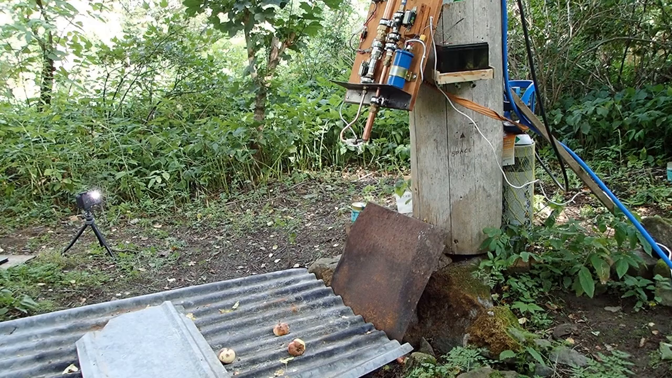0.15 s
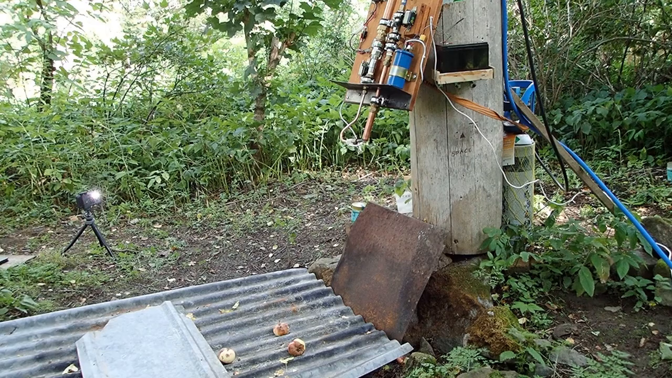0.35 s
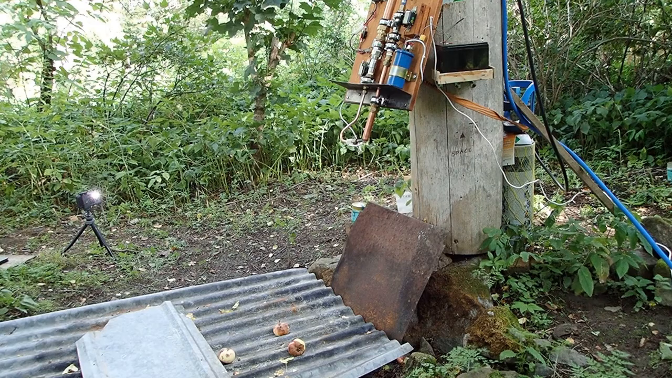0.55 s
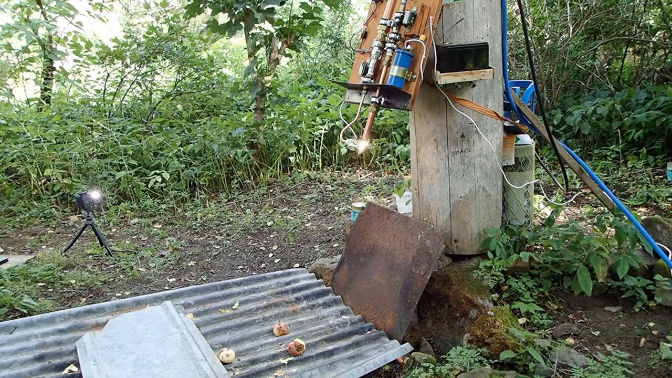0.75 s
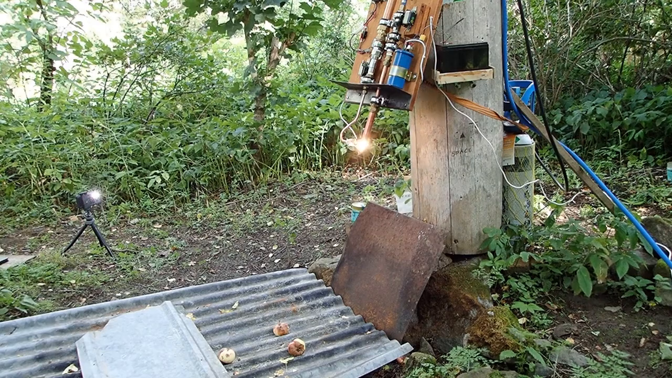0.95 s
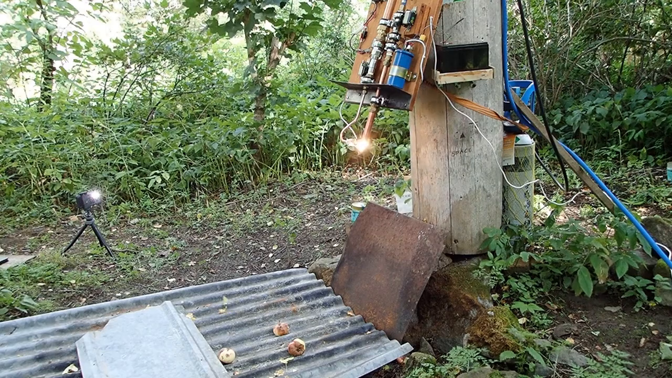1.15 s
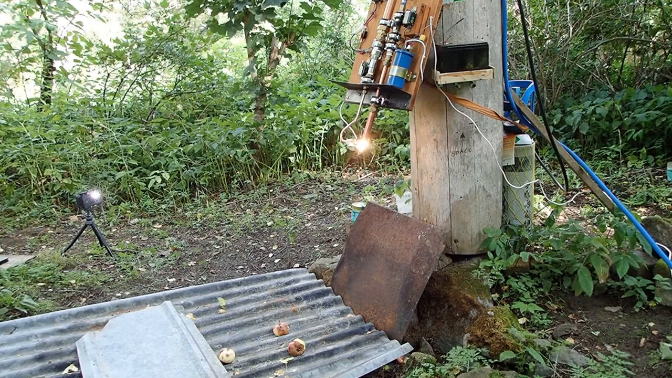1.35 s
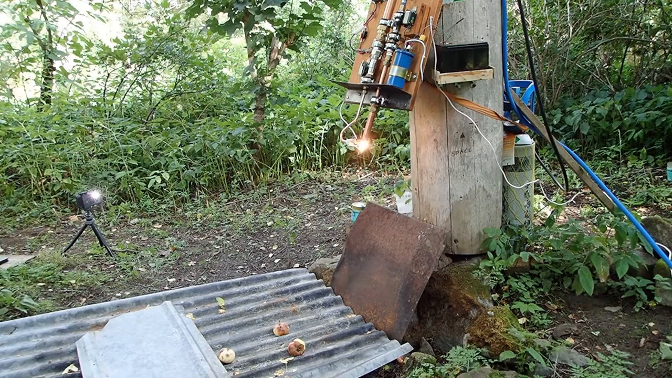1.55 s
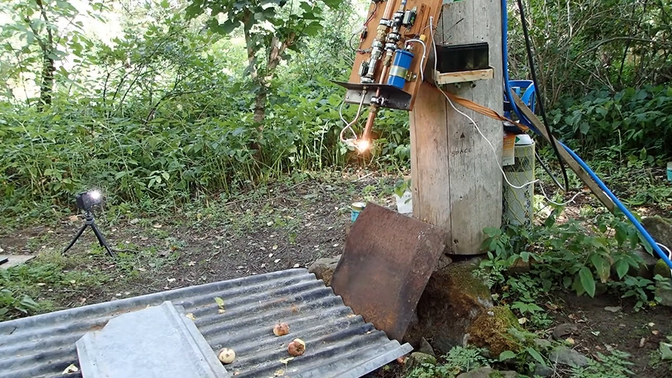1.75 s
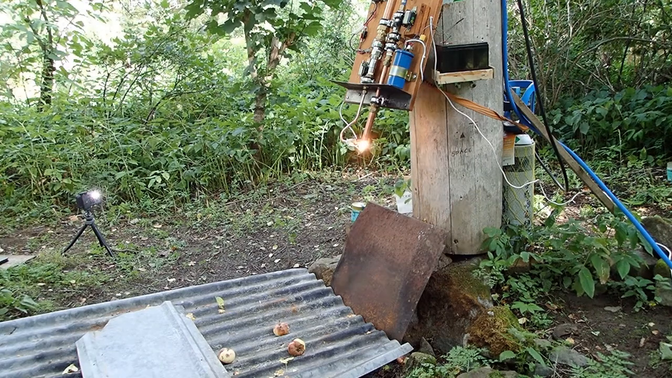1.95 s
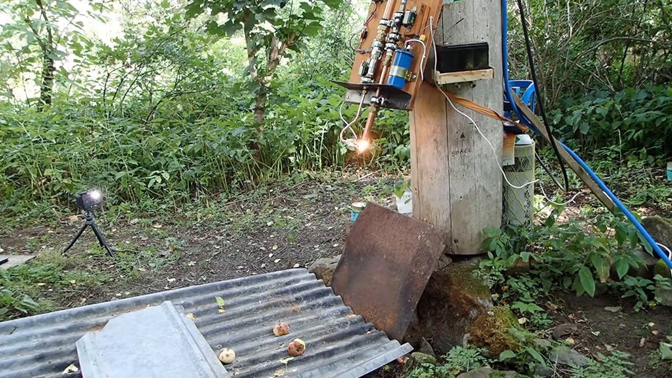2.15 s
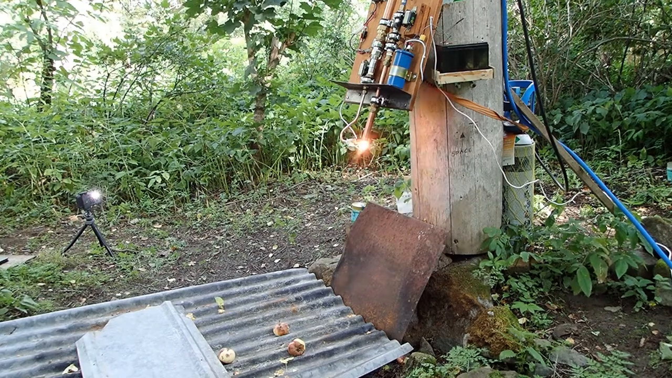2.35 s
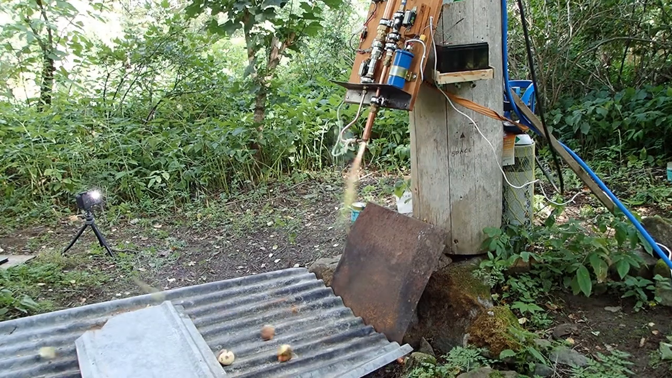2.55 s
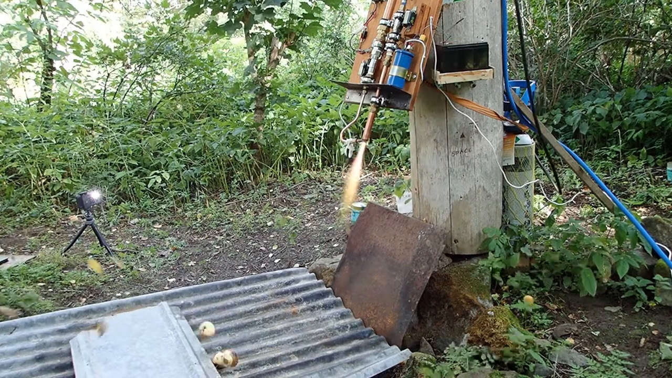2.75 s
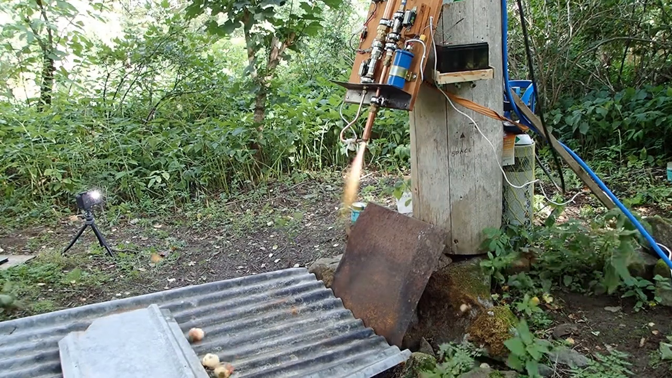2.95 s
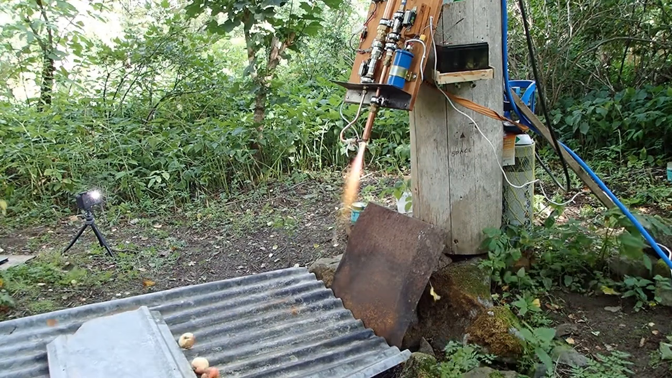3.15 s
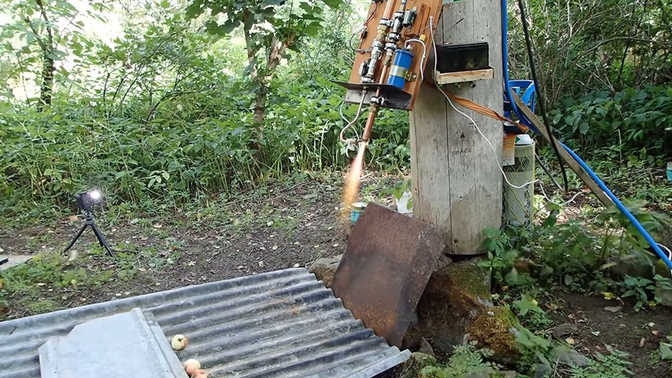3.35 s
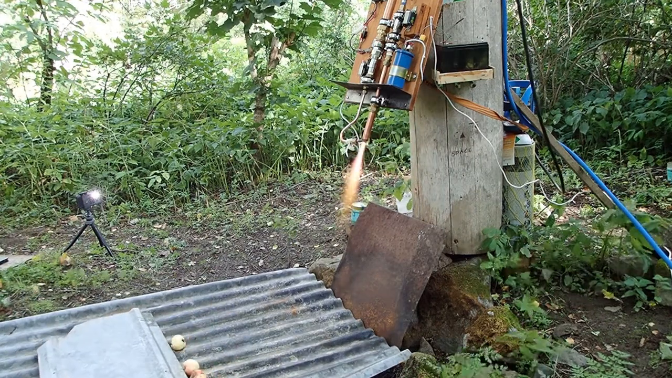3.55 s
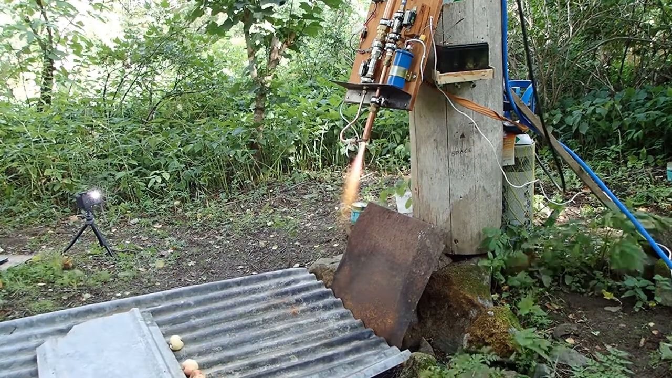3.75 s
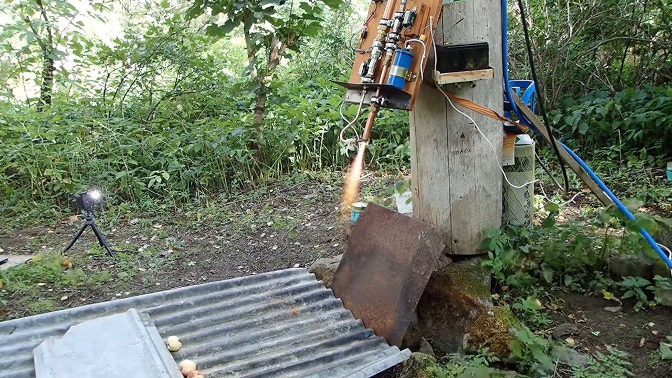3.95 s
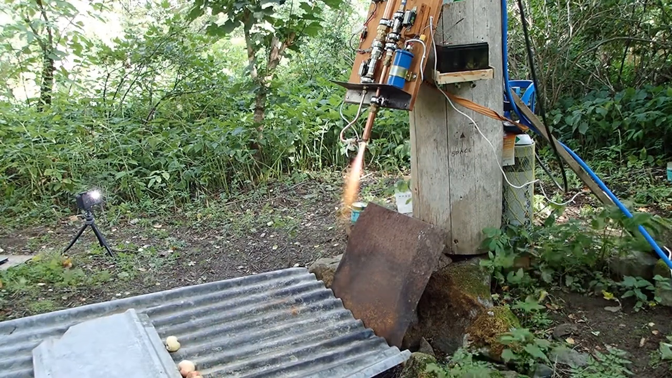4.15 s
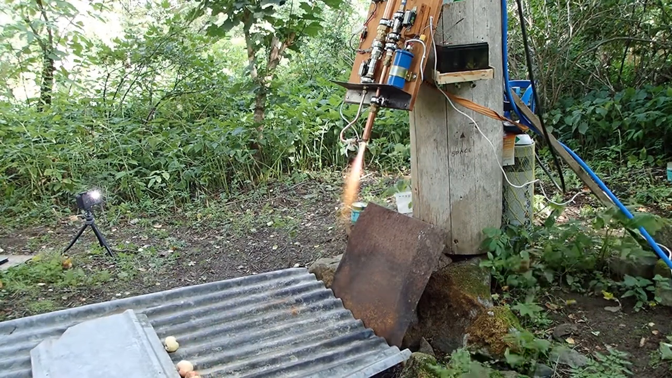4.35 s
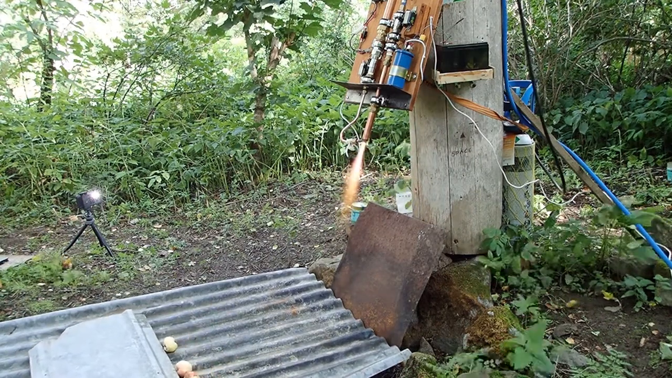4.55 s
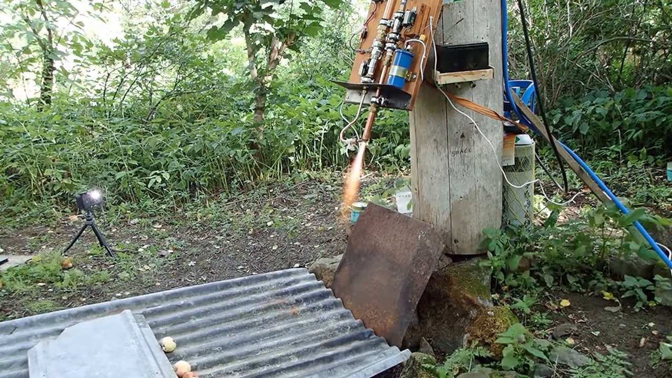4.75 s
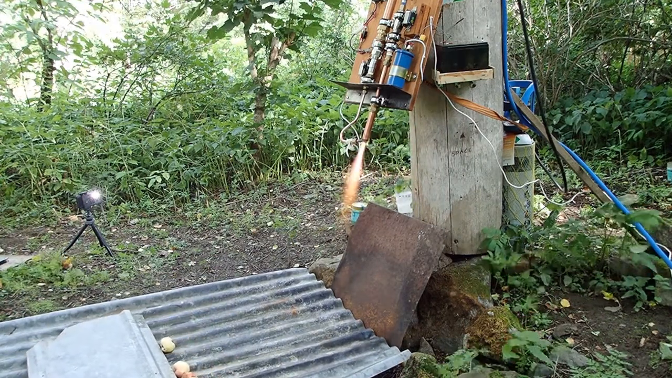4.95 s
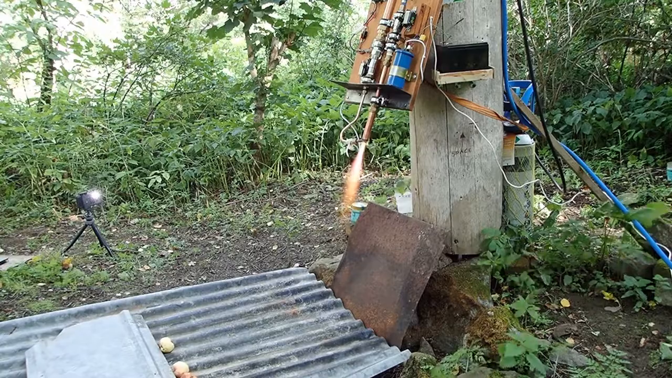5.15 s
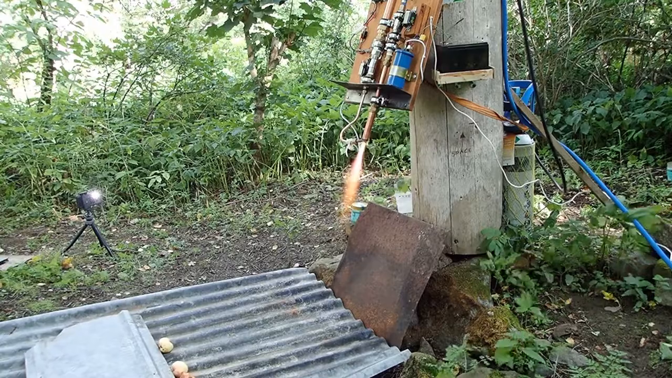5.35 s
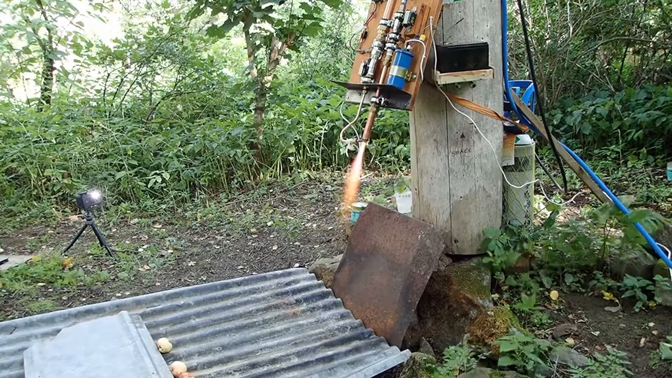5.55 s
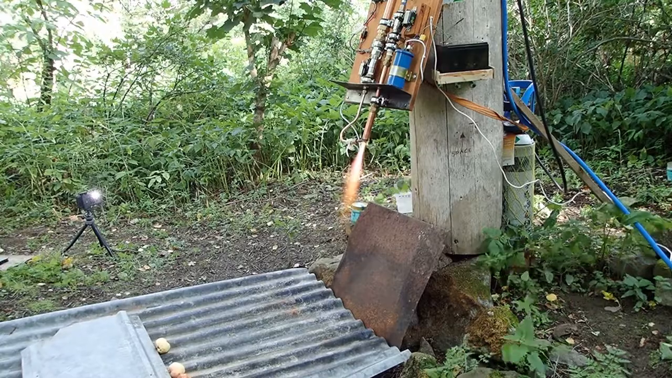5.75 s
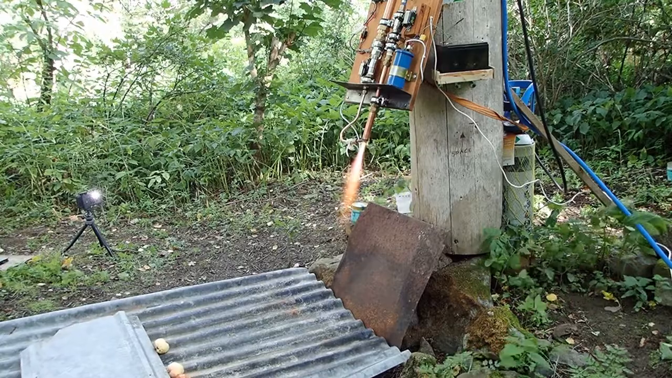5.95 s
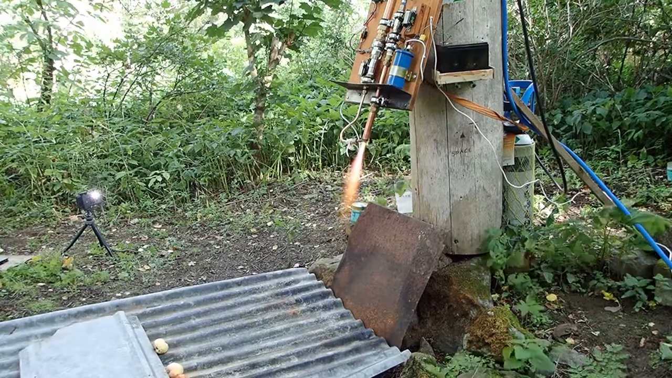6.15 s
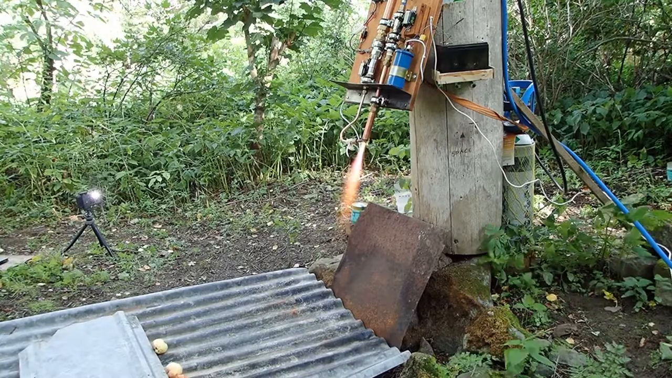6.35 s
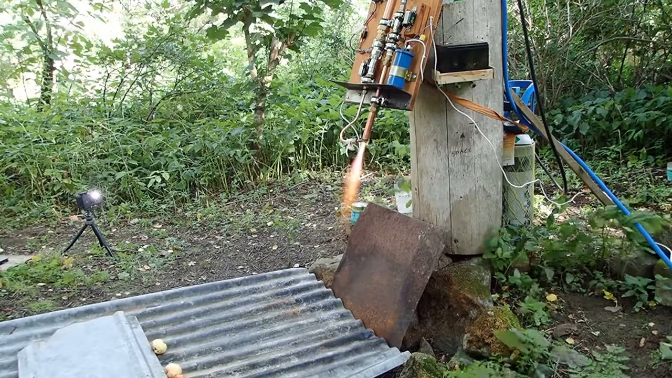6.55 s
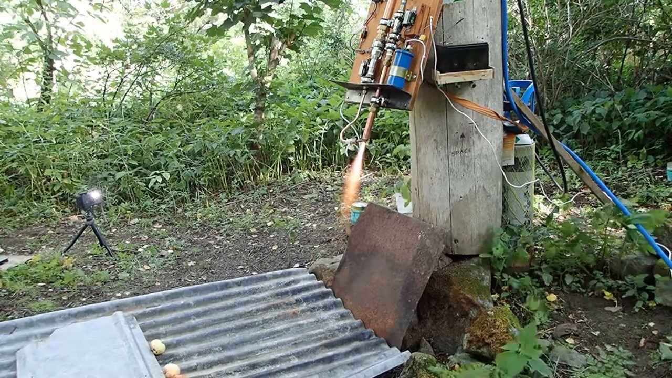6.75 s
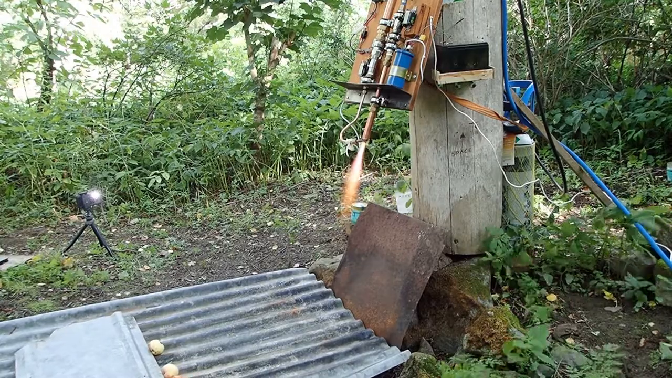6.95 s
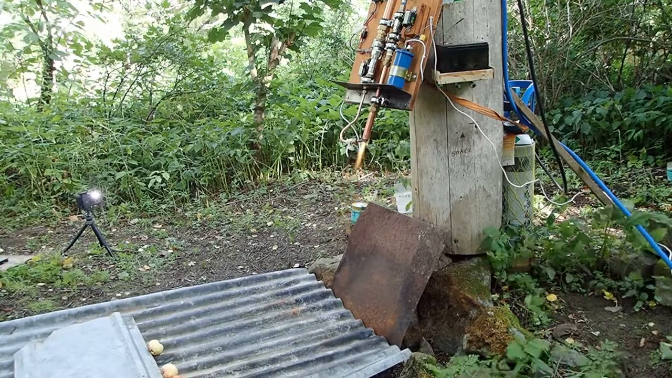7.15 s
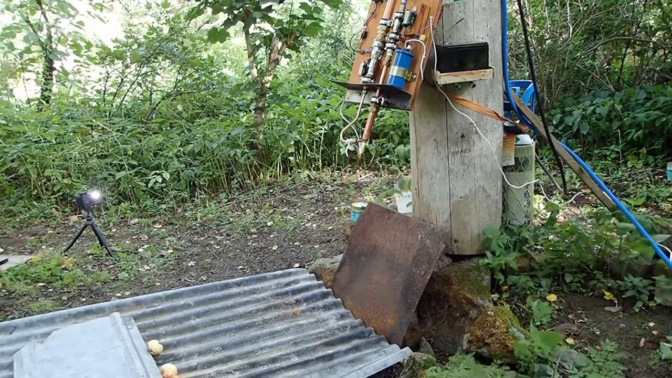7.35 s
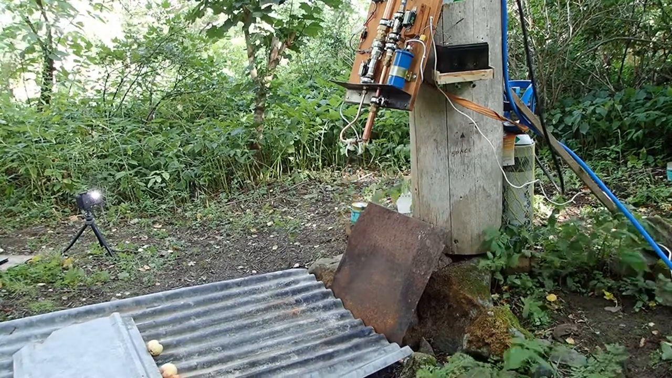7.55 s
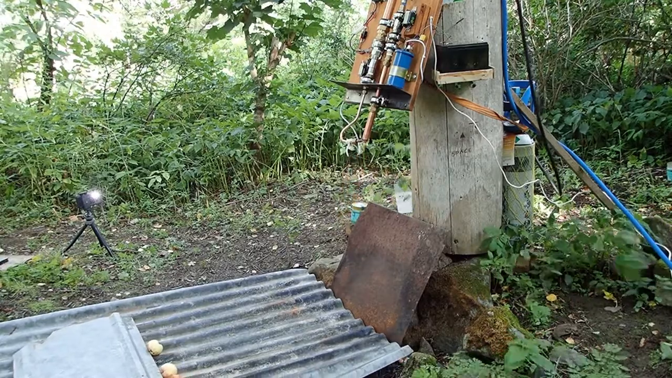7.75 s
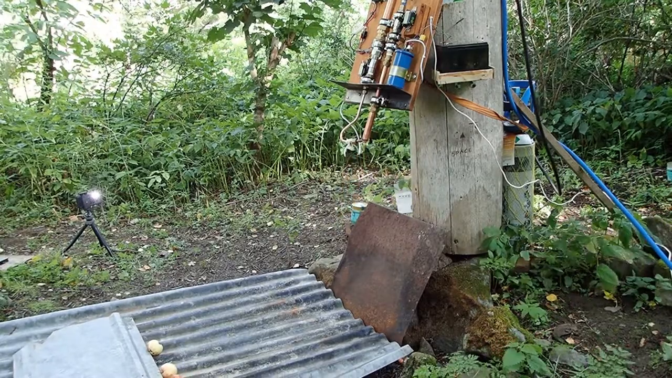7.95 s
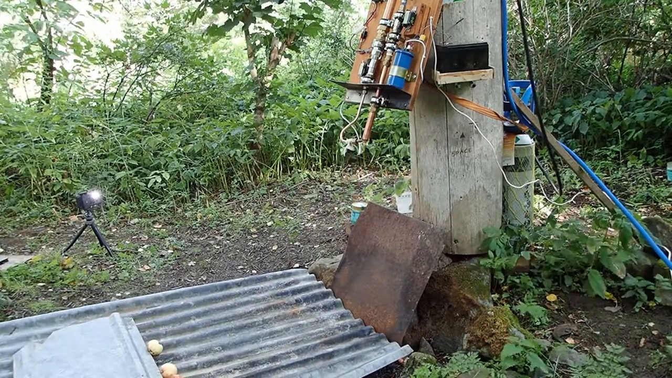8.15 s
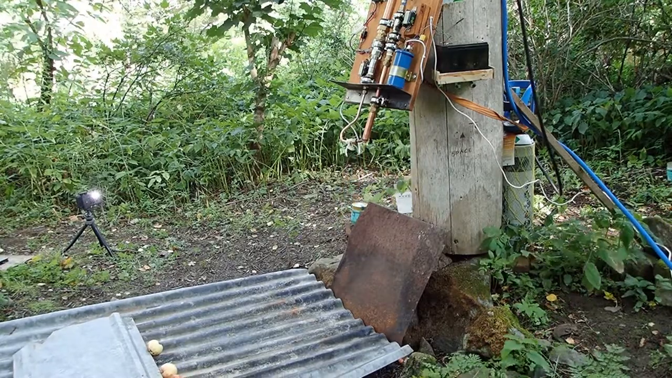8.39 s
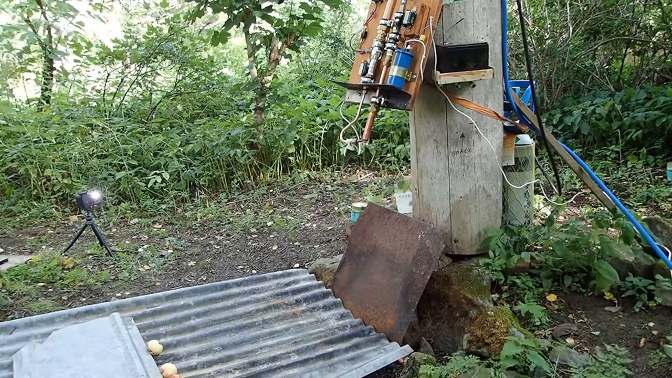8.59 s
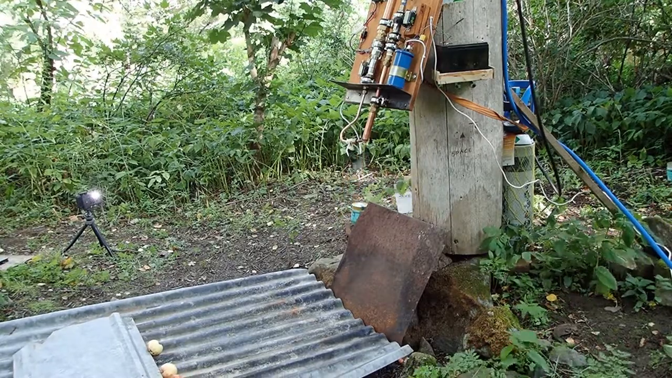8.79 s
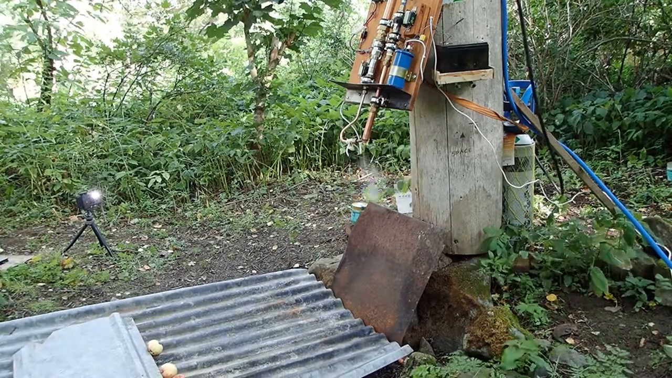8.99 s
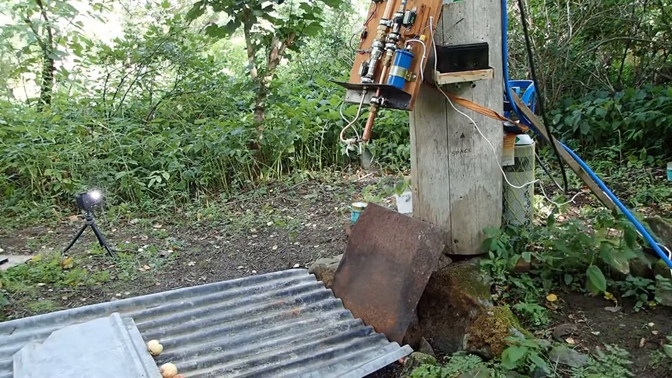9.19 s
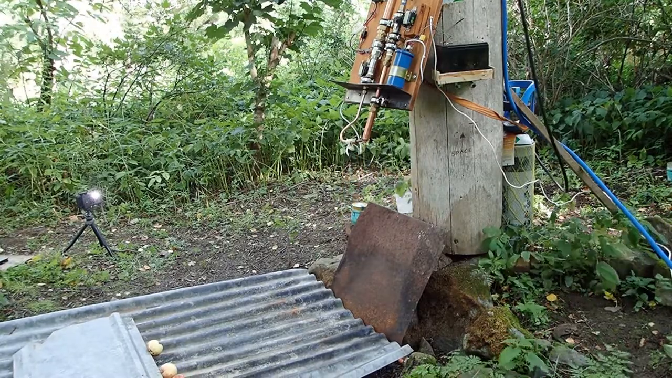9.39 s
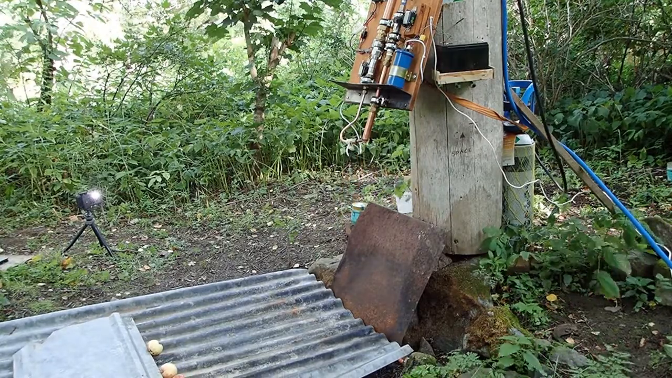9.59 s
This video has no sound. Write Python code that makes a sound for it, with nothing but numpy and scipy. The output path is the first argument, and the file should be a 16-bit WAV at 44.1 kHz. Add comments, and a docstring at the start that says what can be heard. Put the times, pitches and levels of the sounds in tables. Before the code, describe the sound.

A faint gas whistle, then a sputtering hissing flame, a sharp pop, a rough steady howl under loud jet hiss, and a ringing fade.

```python
"""A small rocket engine outdoors: its chamber howls on one rough note under a hissing jet.
First gas seeps, then the valve opens and a flame sputters at the nozzle until it pops into the chamber.
The flame goes out, the feed falters, a last rush of gas blows through and the emptying pipe rings as it fades.
Jet, roar and rumble are shaped noise, ringing parts are noise in narrow resonances, the howl is a
modulated sine with an overtone, and the pops are noise puffs and pressure pulses."""
import sys
import numpy as np
from scipy.fft import rfft, irfft, next_fast_len
from scipy.io import wavfile
from scipy.ndimage import uniform_filter1d, map_coordinates

SR = 44100
rng = np.random.default_rng(int(sys.argv[2]) if len(sys.argv) > 2 else 0)


def master_out(mix):
    """Clip the mix to full scale and print it as 16-bit PCM to the path in sys.argv[1]."""
    frames = np.transpose(np.atleast_2d(mix))
    ceiling = np.clip(frames, -1, 1)
    pcm = np.round(ceiling * 32767).astype(np.int16)
    wavfile.write(sys.argv[1], SR, pcm)


N = 424241

SEEP_ON, VALVE_OPEN, IGNITION, FLAME_OUT, FEED_GAP, VENTING = 0.073, .778, 2.587, 7.212, 7.67, 8.793  # s


def amp(db):
    """Decibels are 20 times the logarithm of an amplitude ratio."""
    return 10 ** (np.asarray(db) / 20)


def unit(x):
    """Normalization to an rms of 1."""
    return x / np.sqrt(np.mean(x ** 2) + 1e-20)


def clock():
    """The time of each sample in seconds."""
    return np.arange(N) / SR


def since(start):
    """Elapsed time in seconds, 0 before start."""
    return np.maximum(clock() - start, 0)


def after(start, rise):
    """A linear transition from 0 to 1 centred on start."""
    return np.clip((clock() - start) / rise + .5, 0, 1)


def swell(s, rise, fall):
    """A two-sided Gaussian envelope of height 1 at time s."""
    t = clock() - s
    return np.exp(-(t / np.where(t < 0, rise, fall)) ** 2)


def puff(start, life):
    """An impulsive onset with exponential decay."""
    return after(start, life / 4) * np.exp(-np.clip((clock() - start) / life, 0, 50))


def push(start, length):
    """One pressure pulse and its opposite rebound."""
    u = np.clip((clock() - start) / length, 0, 50)
    return u * (2 - u) * np.exp(-u)


def along(points, hz):
    """Interpolation of (f/Hz, value) points on a logarithmic frequency axis."""
    f, v = np.transpose(points)
    return np.interp(np.log(hz + 1), np.log(f), v)


def curves(rows):
    """Linear interpolation in time of each column after t/s."""
    s, *columns = np.transpose(rows)
    return [np.interp(clock(), s, column) for column in columns]


def blend(a, b, share):
    """Equal-power crossfade from noise a to noise b."""
    return np.sqrt(1 - share) * a + np.sqrt(share) * b


def wobble(rate):
    """A smooth random modulation with rate knots a second."""
    return map_coordinates(rng.standard_normal(N // 16), [clock() * rate], mode="wrap")


def narrow(pair, side_db):
    """Mid-side width control: less side draws the sound towards the centre."""
    mid = pair.mean(axis=0)
    return mid + amp(side_db) * (pair - mid)


def noise(gain):
    """Spectral filtering of white noise to rms 1, with a left-right correlation set by frequency."""
    # left-right correlation of the noise: f/Hz, correlation
    alike = [(60, 0.38), (250, 0.73), (640, 0.89), (1400, 0.98), (2300, 1), (3300, 1), (5000, 0.85),
             (8000, 0.76), (15000, 0.52)]
    size = next_fast_len(N + 8192)
    hz = np.fft.rfftfreq(size, 1 / SR)
    turn = np.arccos(np.clip(along(alike, hz), -1, 1)) / 2
    spectra = rfft(rng.standard_normal((2, size))) * gain(hz)
    mid, side = irfft(spectra * [np.cos(turn), np.sin(turn)], size)[:, :N]
    return unit(np.array([mid + side, mid - side]))


def rush(spectrum, ripple_db=0, spacing_hz=540):
    """Turbulent noise; evenly spaced tube resonances ripple its spectrum, less so in the top treble."""
    low_end, high_end = (spectrum[0][0] / 2, -80), (spectrum[-1][0] * 2, -80)
    closed = [low_end, *spectrum, high_end]

    def gain(hz):
        ripple = ripple_db * np.cos(2 * np.pi * hz / spacing_hz)
        return amp(along(closed, hz) + ripple * np.interp(hz, [6500, 11000], [1, .45]))

    return noise(gain)


def whistles(modes):
    """Resonance: noise is concentrated at narrow modes, with deep valleys between them."""
    def gain(hz):
        total = 0
        for centre, width, db in modes:
            detuning = (hz * hz - centre * centre) / (1.34 * hz * width + 1e-9)
            total = total + amp(db) / (1 + detuning ** 2)
        return total

    return noise(gain)


def staged(levels):
    """Linear transitions through five levels: pilot, burning, flame out, last rush, venting."""
    changes = [after(IGNITION - .01, 0.05), after(FLAME_OUT - .02, .08),
               after(FEED_GAP, 0.044), after(VENTING, .1)]
    level = levels[0]
    for following, change in zip(levels[1:], changes):
        level = level + (following - level) * change
    return level


def choking():
    """Flow loss: the level falls and recovers as the feed chokes, in dB."""
    # the feed chokes and recovers: t/s, depth/dB, fall/s, recovery/s
    chokes = [(7.31, 2.5, 0.01, 0.015), (7.59, 8, .007, .009), (7.68, 14, 0.031, 0.14),
              (8.835, 9, 0.077, 0.042)]
    return sum(depth_db * swell(s, fall, recovery) for s, depth_db, fall, recovery in chokes)


def flaring():
    """Unsteady combustion: the dB that flares add to roar, rumble and howl."""
    # the flame flares up: t/s, half length/s, roar/dB, rumble/dB, howl/dB
    flares = [(.795, 0.08, 4, -1, 0), (2.605, .03, 0, -1, 5), (2.775, 0.079, 8.5, 12, 4.5),
              (5.857, 0.012, 2.5, 9, 1), (6.426, 0.15, .5, -1.5, 2), (6.97, 0.039, 1, 5, -1),
              (7.1, .02, 0.5, 0, 2)]
    return sum(np.outer(gains_db, swell(s, half, half)) for s, half, *gains_db in flares)


def seep():
    """Flow noise: gas whistles thinly through the nearly closed valve."""
    # spectrum of the seeping gas: f/Hz, relative level per Hz/dB
    hiss_spectrum = [(24, -45), (40, -11), (91, -3), (108, -7), (235, -7), (1600, -8.5), (1770, -6),
                     (2450, -25.5), (3470, -24.5), (5860, -7.5), (7340, -5.5), (9180, -13), (10900, -22),
                     (13300, -9), (15500, -22)]
    # whistling resonances: f/Hz, nominal width/Hz, relative level/dB
    whistle_modes = [(1080, 150, 2), (6030, 200, -2), (7480, 180, -8), (8980, 170, 6), (11500, 260, -5),
                     (13200, 220, -2)]
    gas = amp(-47.5) * rush(hiss_spectrum) + amp(-54.5) * whistles(whistle_modes)
    return gas * after(SEEP_ON, 0.01) * (1 - after(VALVE_OPEN, .1))


def flow():
    """Jet level follows the gas flow: set in each stage, kicked by ignition, dying with the pipe's pressure."""
    # flow before the flame jumps into the chamber: t/s, hiss level/dB
    pilot_flow = [(.79, -15), (.86, -17), (1.05, -14.5), (1.3, -16.5), (2.0, -17), (2.56, -12.5)]
    kick_db, kick_s = 4.8, .22  # ignition drives the jet harder for a moment
    empty_s, empty_power = 0.98, 1.92  # pressure loss time; the hiss follows a power of the pressure left
    pilot_db, = curves(pilot_flow)
    burn_db = -15 + kick_db * swell(IGNITION, kick_s, kick_s)
    flame_out_db, last_rush_db = -15.5, -14
    pressure = np.maximum(1 - since(VENTING) / empty_s, .01)
    vent_db = -23 + empty_power * 20 * np.log10(pressure)
    return staged([pilot_db, burn_db, flame_out_db, last_rush_db, vent_db]) - choking()


def jet():
    """Jet turbulence: a rippled hiss turns smooth while burning, then cold, and at last rings in the pipe."""
    # jet of pilot and burning stages: f/Hz, relative level per Hz/dB
    jet_spectrum = [(2000, -19.5), (3100, -27.5), (4000, -17), (5200, -6), (6200, -1), (6950, 0.5),
                    (7750, -5), (8800, -1), (9400, -4.5), (10350, -16), (12800, -14), (14300, -18.5),
                    (15700, -26)]
    # unlit jet: f/Hz, relative level per Hz/dB
    cold_spectrum = [(2000, -27), (3000, -32), (4500, -16), (6000, -5), (7000, -0.5), (8300, -2),
                     (8900, 2.5), (9600, 0.5), (10200, -11), (11200, -12.5), (12200, -13), (14100, -14.5),
                     (15700, -23)]
    # resonances of the feed pipe before the pitch ratio: f/Hz, nominal width/Hz, relative level/dB
    pipe_modes = [(3500, 200, -23), (4980, 140, -3), (5500, 250, -14), (6510, 125, 4.5), (7140, 270, -10),
                  (8130, 180, 2), (9600, 230, -1.5), (11280, 350, -8.5), (12800, 500, -13),
                  (14400, 800, -17)]
    vent_ratio, vent_jump, cooling_per_s = 1.01, .035, .065

    pilot = narrow(rush(jet_spectrum, ripple_db=2.5, spacing_hz=536), side_db=-1.5)
    cold = narrow(rush(cold_spectrum, ripple_db=1.0, spacing_hz=875), side_db=0.0)
    burning = narrow(rush(jet_spectrum), side_db=1.6)
    hiss = blend(pilot, burning, after(IGNITION, 0.054))
    hiss = blend(hiss, cold, after(FEED_GAP, 0.085))

    # the pitch jumps as the pipe vents, then sinks as the expanding gas cools
    ratio = vent_ratio - vent_jump * (1 - after(VENTING + 0.042, .1)) - cooling_per_s * since(VENTING)
    position = np.cumsum(ratio)  # samples into the ringing noise
    ringing = whistles(pipe_modes)
    pipe = np.array([map_coordinates(side, [position], order=5, mode="wrap") for side in ringing])
    vented = (pipe + amp(-8.5) * cold) * amp(0.93 * wobble(60))
    hiss = blend(hiss, vented, after(VENTING, 0.087))

    flutter_db = 0.6 * wobble(12) + 0.5 * wobble(50) + 0.58 * wobble(300)
    return hiss * amp(flow() + flutter_db)


def chugging():
    """Low-frequency combustion instability: uneven surges a few dozen times a second."""
    spectrum = [(2, -15), (12, -5.0), (28, -1.0), (50, -3.0), (85, -7.0),
                (160, -15.0), (400, -38), (900, -100)]
    return noise(lambda hz: amp(along(spectrum, hz)))[0]


def turbulence():
    """Stage-dependent turbulence levels: roar and rumble drift in dB; flares add, chokes take away."""
    # each stage from its start: roar/dB, roar fade/(dB/s), rumble/dB, rumble fade/(dB/s); negative fade grows
    stages = { "pilot": (-26.5, 2, -34, 7.5), "burning": (-23, .5, -39.5, 0.63),
              "flame out": (-32.5, 3.5, -47, -12), "last rush": (-39.5, 0.4, -56.5, 2),
              "venting": (-39, 23, -53, 14), }
    starts = [VALVE_OPEN, IGNITION, FLAME_OUT, FEED_GAP, VENTING]
    levels = []
    for start, (roar_db, roar_fade, rumble_db, rumble_fade) in zip(starts, stages.values()):
        elapsed = since(start)
        levels.append(np.array([roar_db - roar_fade * elapsed, rumble_db - rumble_fade * elapsed]))
    return staged(levels) + flaring()[:2] - choking()


def plume(surge):
    """Combustion noise: roar and low rumble swell with each surge, and cold gas noise follows the flame."""
    # roar of pilot flame, lit chamber and unlit gas: f/Hz, relative level per Hz/dB
    pilot_roar = [(300, -20.5), (520, -7.5), (790, -13), (1080, 0.5), (1350, -12.5), (1560, -5.5),
                  (1800, -7.5), (2100, -16), (2400, -21.5), (3500, -26.5)]
    chamber_roar = [(300, -31), (520, -8.5), (850, 1), (1100, -5.5), (1480, 0.5), (1850, -8), (2080, -8),
                    (2500, -22), (3500, -23.5)]
    cold_roar = [(300, -21), (520, -3.5), (750, -7.5), (1150, 1), (1550, 1.5), (2000, -3), (2450, -24.5),
                 (3500, -16)]
    # low resonances of the venting pipe: f/Hz, nominal width/Hz, relative level/dB
    pipe_low = [(540, 220, -2), (1020, 340, -2.3), (1835, 205, 2)]
    # rumble of pilot flame, lit chamber and unlit gas: f/Hz, relative level per Hz/dB
    pilot_rumble = [(30, -32), (60, -25), (100, -9), (170, 2), (270, -3), (420, 0), (700, -6), (1500, -40)]
    lit_rumble = [(20, -28), (50, -14.5), (100, -4), (170, 0), (300, 0.5), (450, -1.5), (700, -10.5),
                  (1500, -42)]
    cold_rumble = [(20, -3), (60, 0.5), (150, -0.5), (400, -2), (700, -10), (1500, -40)]

    roar_db, rumble_db = turbulence()
    lit = after(IGNITION, .01)
    pilot = narrow(rush(pilot_roar), side_db=-17)
    roar = blend(pilot, amp(-.5) * narrow(rush(chamber_roar), side_db=3.5), lit)
    roar = blend(roar, narrow(rush(cold_roar), side_db=-21), after(FLAME_OUT, .02))
    roar = blend(roar, amp(2.0) * whistles(pipe_low), after(VENTING, .07))
    roar = roar * amp(roar_db + 2.35 * surge + 0.48 * wobble(14))

    rumble = blend(rush(pilot_rumble), rush(lit_rumble), lit)
    rumble = blend(rumble, rush(cold_rumble), after(FEED_GAP, .04))
    rumble = rumble * amp(rumble_db + 2.8 * surge + 1.1 * wobble(14))
    # the flame's rumble leans to the right; that of the cold gas is nearer the centre
    right_db = 3.5 - 2.0 * after(FEED_GAP, .08)
    return roar + rumble * amp([-right_db, right_db])


def pops():
    """Impulsive combustion: each hiccup of flame or feed is a low puff; ignition adds a sharp bang."""
    # uneven combustion and hiccups of the feed: t/s, relative thump level/dB
    hiccups = [(2.588, -27), (2.712, -26), (2.75, -28), (3.3, -33), (3.53, -32), (3.82, -30), (4.18, -31),
               (4.41, -32), (5.078, -32), (5.852, -27), (6.182, -25), (6.4, -35), (6.94, -31), (6.995, -30),
               (7.79, -39)]
    thumps = sum(amp(db) * puff(s, life=0.0094) for s, db in hiccups)
    pushes = sum(amp(db + 9) * push(s, length=.0009) for s, db in hiccups)
    thud = rush([(25, -17), (70, -8), (140, 7.5), (260, -7), (600, -14)])
    low = (thud * thumps * amp(-1.5) + pushes) * amp([[-4], [2]])  # louder on the right

    crack = rush([(600, 2), (2000, -7), (3100, -24), (6500, -4), (9000, -4), (15000, -16)])
    # the charge in the chamber goes off as one pressure pulse and its rebound
    u = np.clip((clock() - IGNITION) / 0.00038, 0, 50)
    bang = (u > 0) * (u - 1) * np.exp(-u)
    return low + amp(-6) * crack * puff(IGNITION, life=0.0048) + amp(1.0) * uniform_filter1d(bang, size=12)


def chamber(surge):
    """Thermoacoustic resonance: the flame drives the first mode; strong swings add an overtone."""
    # overtone: relative level/dB, dB per unit of surge, dB per dB of flare
    overtone_db, per_surge_db, per_flare = (-11, 1.5, .7)
    # the note rises as the gas heats, overshoots, then settles
    cold_hz, note_hz, warm_at, warm_s = 640, 727.3, 2.69, 0.132  # Hz, Hz, middle of the rise s, its length s
    overshoot_hz, overshoot_at, settle_s = 19.94, 2.77, 0.1197
    surge_hz = 5.6  # lift of the note per unit of surge
    howl_db, hold_s, sag_db_per_s = -20, 2.3, 2  # the howl holds, then weakens

    pitch_hz = cold_hz + (note_hz - cold_hz) * after(warm_at, warm_s)
    pitch_hz = pitch_hz + overshoot_hz * swell(overshoot_at, .025, settle_s) + surge_hz * surge
    roughness = 1 + 0.00705 * wobble(45) + 0.024 * wobble(300)
    phase = 2 * np.pi * np.cumsum(pitch_hz * roughness) / SR

    flare_db = flaring()[2]
    level_db = howl_db - sag_db_per_s * since(IGNITION + hold_s) + flare_db + 0.65 * wobble(12)
    # the amplitude saturates in strong surges and briefly collapses between them
    swing = unit(np.tanh(amp(5.4 * surge + 2.0 * wobble(70) - .5)))
    overtone_gain = amp(overtone_db + per_surge_db * surge + per_flare * flare_db)
    overtone = overtone_gain * swing ** 2 * np.sin(2 * phase + 0.55 * wobble(200))
    return (swing * np.sin(phase) + overtone) * amp(level_db)


def last_rush():
    """Aeroacoustic whistling: cold gas excites resonances at the nozzle's lip as it blows through."""
    # shrill swells, before flutter: t/s, level/dB, rise/s, fall/s
    shrill = [(8.12, -24.5, .13, 0.16), (8.64, -23.5, .17, 0.091)]
    # resonances of the nozzle: f/Hz, nominal width/Hz, relative level/dB
    nozzle_modes = [(9500, 460, -3), (10600, 600, 3), (11300, 700, -3), (14100, 400, -9)]
    strength = sum(amp(db) * swell(s, rise, fall) for s, db, rise, fall in shrill)
    return whistles(nozzle_modes) * strength * amp(0.88 * wobble(40))


def vent_puff():
    """Pressure release: a soft, hollow cough as the pipe lets go of its gas."""
    cough = rush([(120, -13), (330, 3), (600, 0), (1000, -8)])
    return amp(-36) * cough * puff(8.916, life=.04)


def scene():
    """Superposition of the sources; one surge signal modulates both plume and howl."""
    burning = after(IGNITION + 0.012, 0.0072) * (1 - after(FLAME_OUT, .008))
    # chugging sets in fully once the chamber is up to pressure
    surge = chugging() * (0.34 + 0.64 * after(2.96, 0.27) * burning)
    engine = (jet() + plume(surge)) * after(VALVE_OPEN, 0.012)
    return seep() + engine + burning * chamber(surge) + last_rush() + pops() + vent_puff()


def record(dry):
    """Two-microphone reception: soft limiting, then phase and level differences and a band limit."""
    # phase by which the left microphone leads: f/Hz, phase/rad
    lead = [(60, 0), (260, 0.73), (730, 0.45), (1100, 0.28), (1550, 0), (4000, 0), (4820, 1), (6030, 0.06),
            (6980, 0.5), (8350, 0.17), (10500, 0)]
    # colouring by the two microphone ports: f/Hz, left over right/dB
    port_balance = [(150, -2), (700, .5), (1400, 0.1), (3500, -1), (4300, -3), (5400, 2), (6500, -1),
                    (7500, 2.7), (9000, 2), (11500, 0), (13800, 4), (15500, 2)]
    top_hz = 15700
    size = next_fast_len(N + 8192)
    hz = np.fft.rfftfreq(size, 1 / SR)
    sides = np.array([[.5], [-.5]])  # each side takes half of the difference
    ports = np.exp(1j * along(lead, hz) * sides) * amp(along(port_balance, hz) * sides)
    held = dry / (1 + np.abs(dry) ** 6) ** (1 / 6)  # soft limit at 1
    return irfft(rfft(held, size) * ports * (hz < top_hz), size)[:, :N]


dry = scene()
out = record(dry)
master_out(out)
```